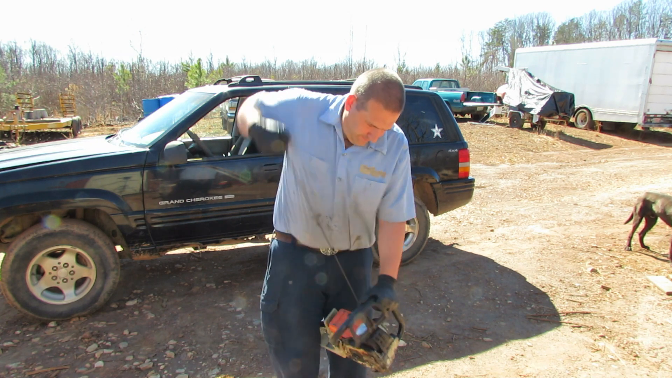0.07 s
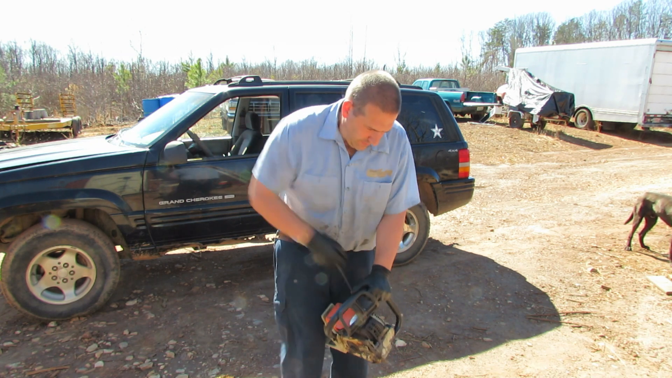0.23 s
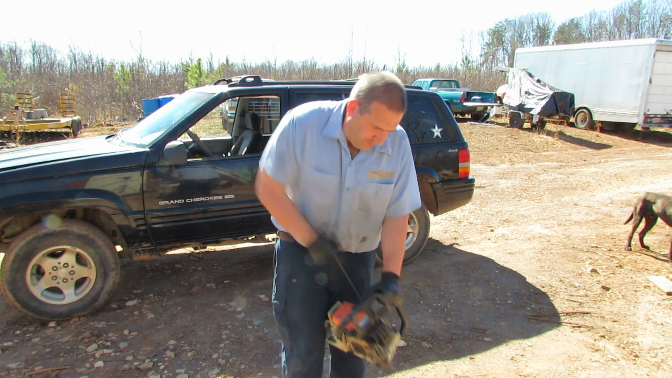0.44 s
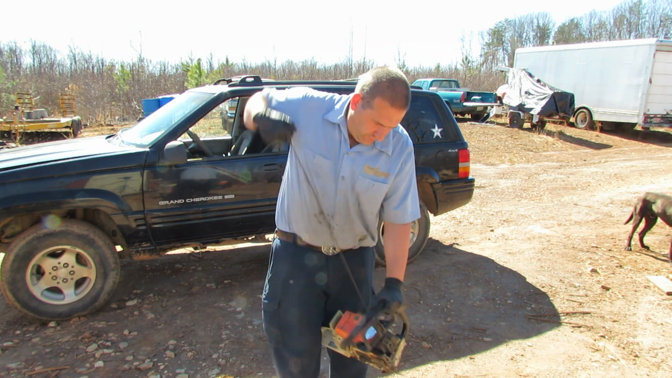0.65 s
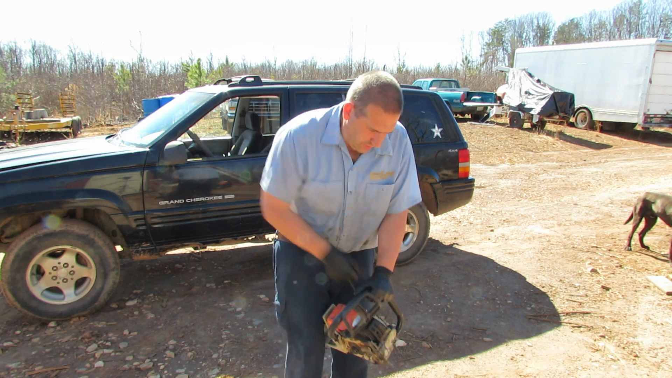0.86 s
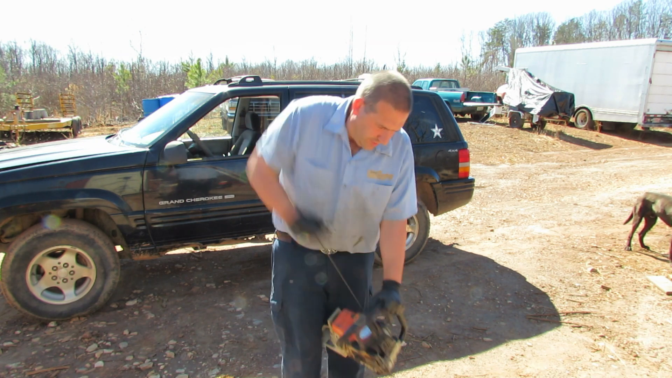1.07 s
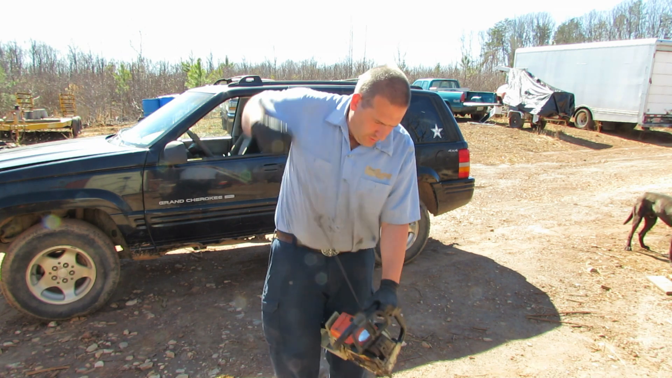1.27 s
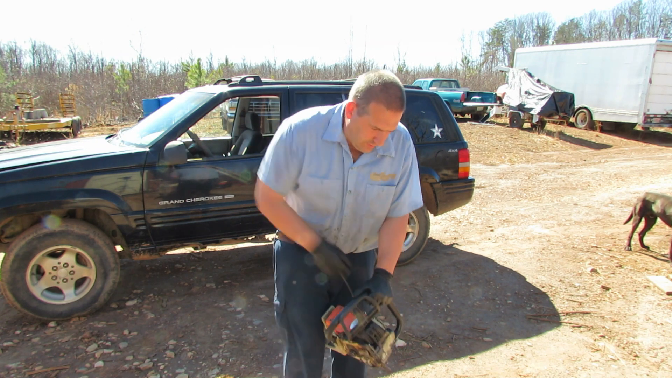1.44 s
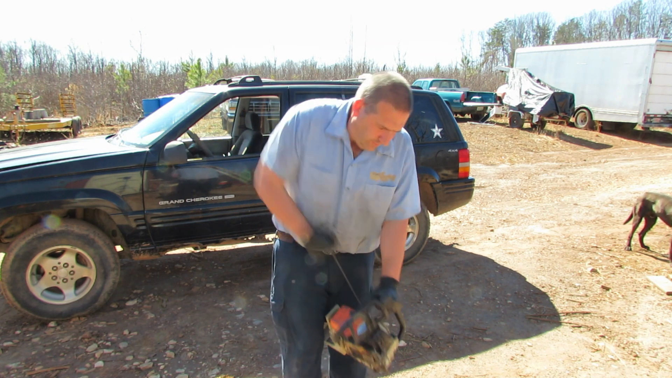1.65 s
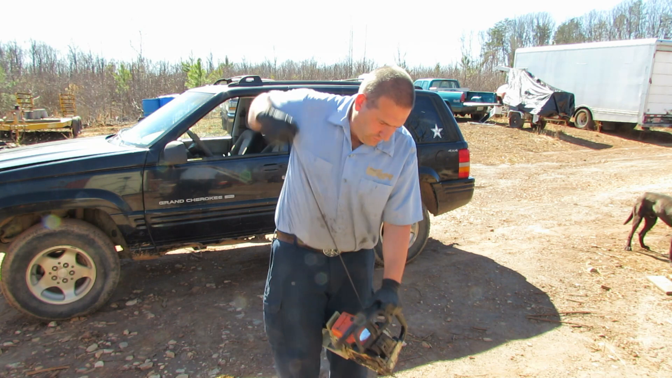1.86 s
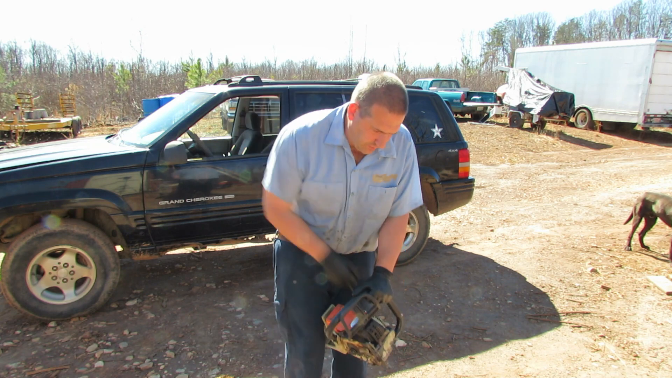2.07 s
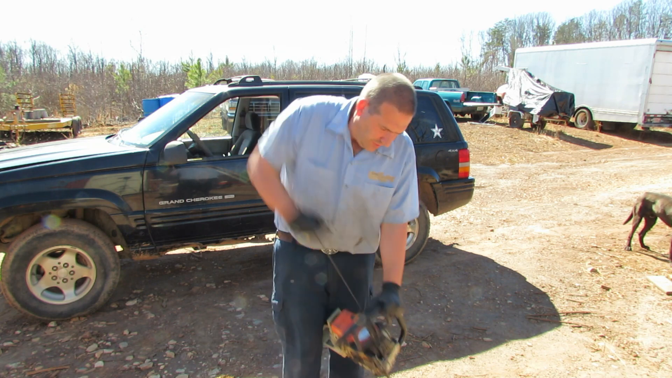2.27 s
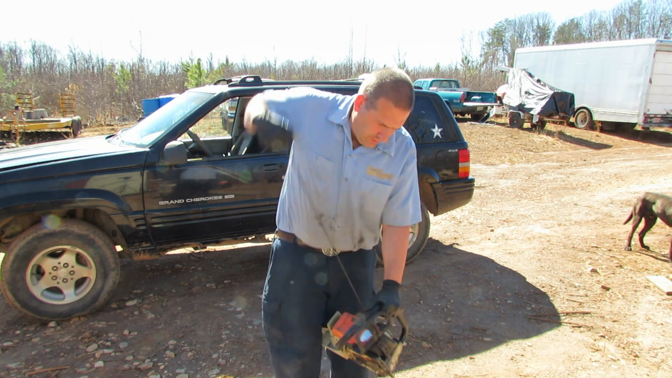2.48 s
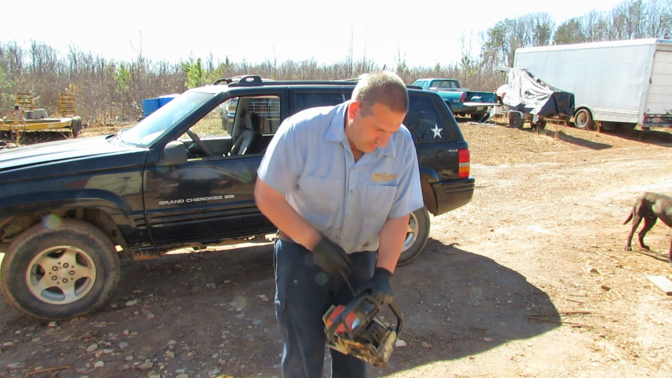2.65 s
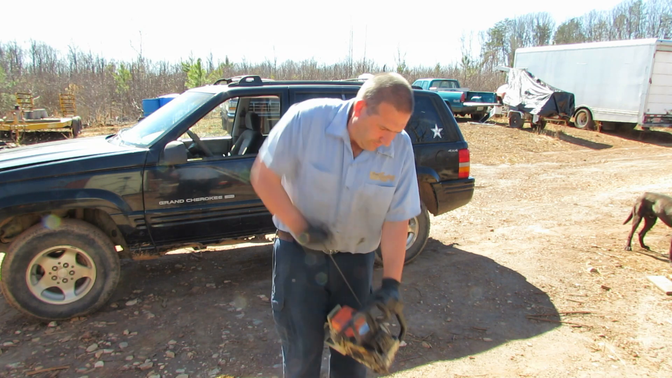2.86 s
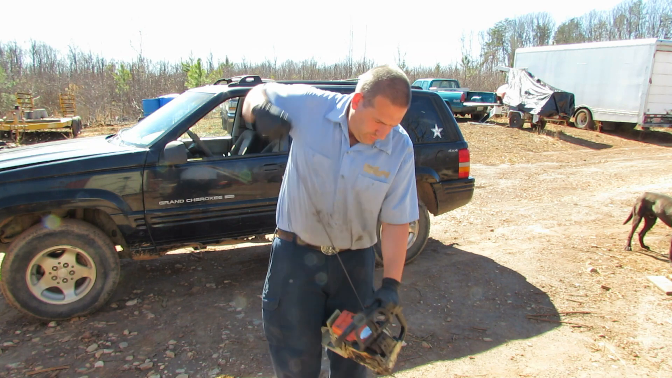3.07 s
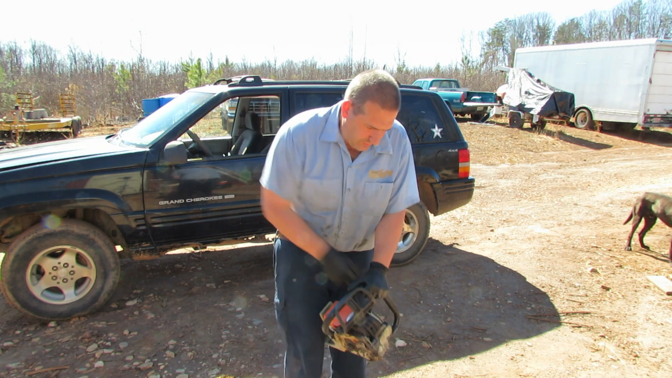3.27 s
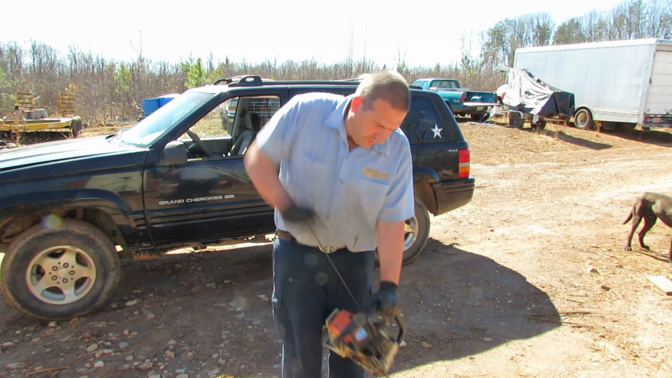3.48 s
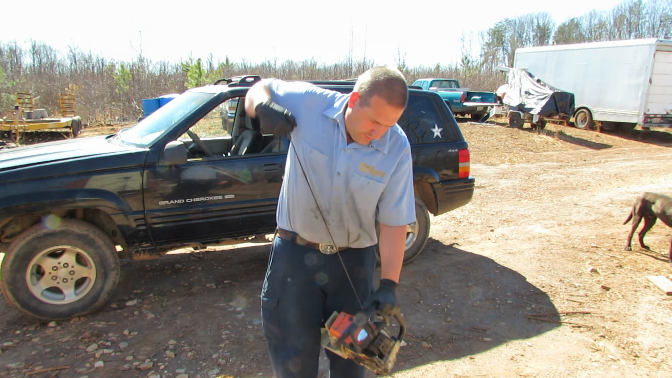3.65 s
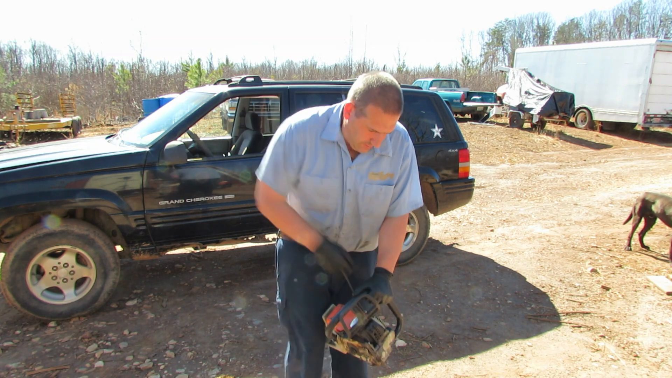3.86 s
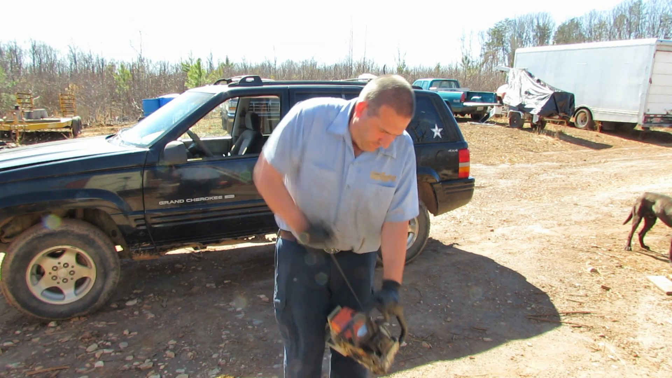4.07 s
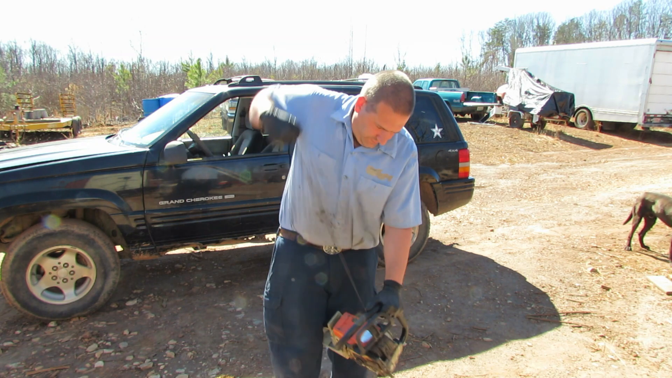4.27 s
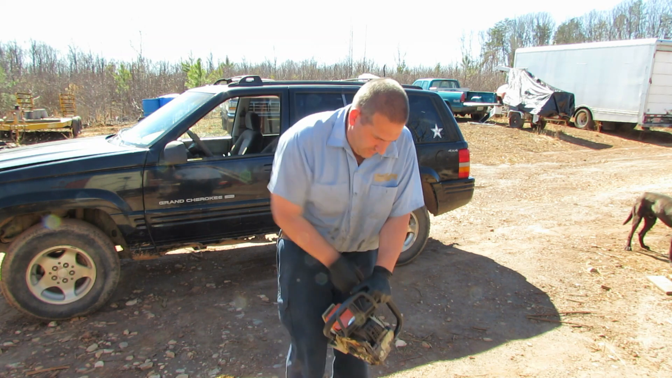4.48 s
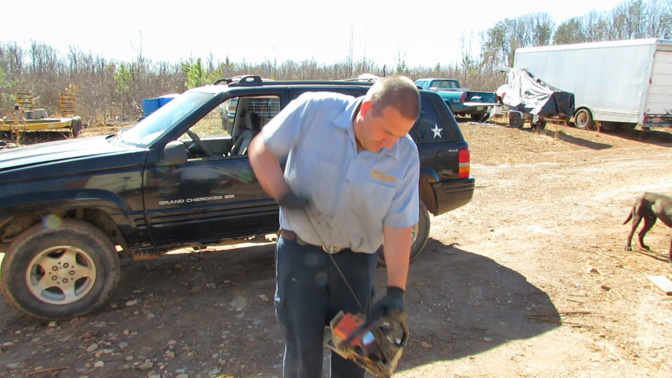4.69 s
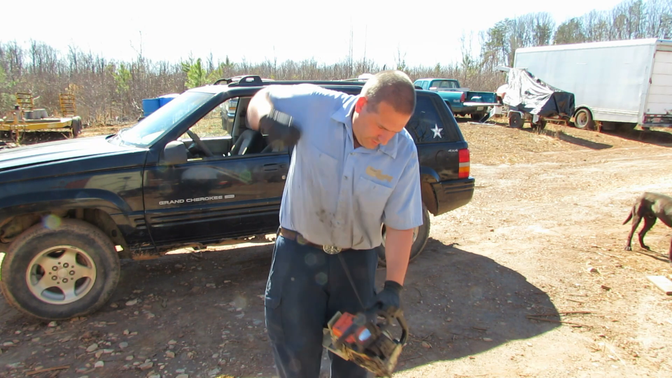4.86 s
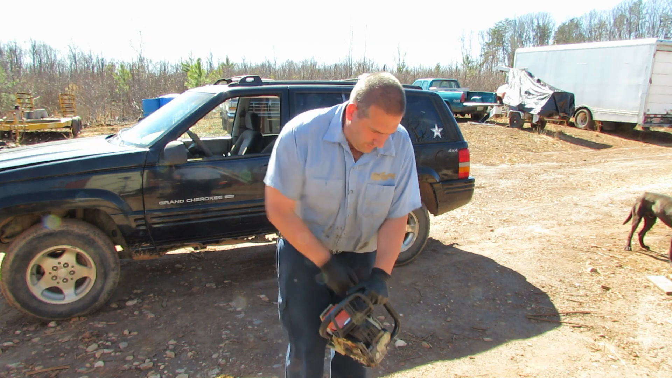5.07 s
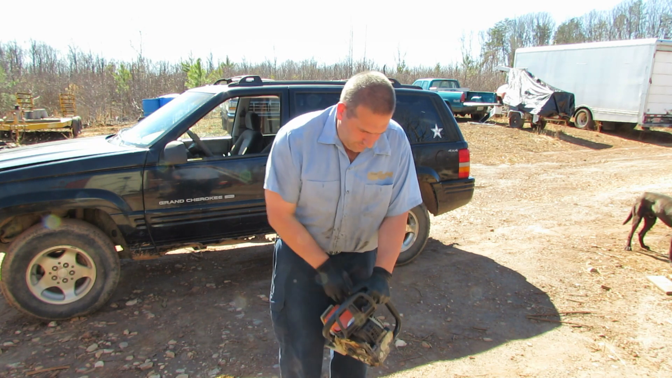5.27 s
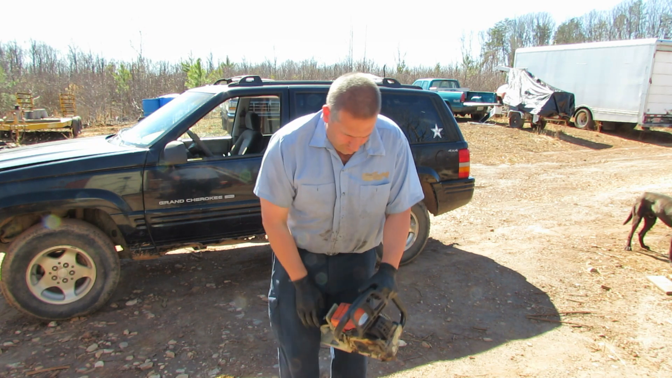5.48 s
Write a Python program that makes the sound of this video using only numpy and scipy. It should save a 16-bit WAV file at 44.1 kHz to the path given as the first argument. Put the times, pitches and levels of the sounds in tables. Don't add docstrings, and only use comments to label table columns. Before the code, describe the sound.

Close outdoor capture of a small two-stroke chainsaw being pull-started. Nine quick pulls, about 0.6 seconds apart, each give a burst of bright whistling chuffs and dull thumps, followed by cord rewind, grip knock and pawl clack. The level drops abruptly halfway. The last pull catches and the engine revs up roughly with cracking firings.

```python
import sys
import numpy as np
from scipy import signal
from scipy.fft import rfft, irfft, next_fast_len
from scipy.io import wavfile
from scipy.ndimage import uniform_filter1d

SR = 44100
rng = np.random.default_rng(int(sys.argv[2]) if len(sys.argv) > 2 else 0)


def put_to_file(sound):
    columns = np.atleast_2d(sound).T
    safe = np.clip(columns, -1, 1)
    whole_steps = np.round(safe * 32767)
    wavfile.write(sys.argv[1], SR, whole_steps.astype(np.int16))


def invert_db(level):
    return 10 ** (np.asarray(level, dtype=float) / 20)


N = 243873

GAIN_CUT_S, GAIN_CUT_DB = 3.019, -13

# first_turn_s, up_to_speed_s, cord_end_s, last_coasting_turn_s
PULLS = [
    (-.137, -.098, .0245, .158),
    (.4591, .4998, .6237, .7467),
    (1.0583, 1.0989, 1.2204, 1.337),
    (1.6606, 1.7013, 1.828, 1.9706),
    (2.2709, 2.3108, 2.4284, 2.5363),
    (2.8707, 2.9087, 3.0286, 3.139),
    (3.4748, 3.513, 3.6335, 3.7468),
    (4.0727, 4.113, 4.2322, 4.3391),
    (4.6702, 4.7082, 4.824, 4.93),
]
PULL_DB = [-3.5, -0.2, -0.4, -0.5, 0.66, 0.16, -0.6, -0.2, 0.5]
STAGES = [0, 1, 1.259, 1.498, 1.736, 2, 2.358, 3]
# time_s, speed_turns_per_s
SPEED = [(4.79, 53.7), (4.83, 60.7), (4.88, 73.7), (4.98, 93.3), (5.12, 104.3), (5.2, 110.6), (5.3, 110.4),
         (5.42, 113.2), (5.53, 113.2)]
# pitch_hz, density_db
RUMBLE = [(50, -77), (160, 8.5), (350, 14.5), (450, 11), (800, 8), (1250, 7), (2200, 3), (3200, -68.5)]


def gain_db(s):
    return GAIN_CUT_DB * np.clip((np.asarray(s) - GAIN_CUT_S) * 500, 0, 1)


def in_time(rows):
    s, *columns = np.transpose(rows)
    return [np.interp(np.arange(N) / SR, s, c) for c in columns]


def clicks(s, db):
    out = np.full(N, 1e-18)
    at = np.clip(np.round(np.asarray(s) * SR).astype(int), 0, N - 1)
    np.add.at(out, at, invert_db(db - gain_db(s)))
    return out


def burst(x, rise_ms, fall_ms):
    rise = np.exp(-1000 / SR / max(rise_ms, .05))
    fall = np.exp(-1000 / SR / max(fall_ms, .05))
    return signal.lfilter([1 - rise], [1, -rise], signal.lfilter([1], [1, -fall], x))


def noise(spectrum):
    # pitch_hz, side_minus_mid_db
    width_curve = [(35, 11.5), (75, -16), (130, -18.5), (400, -33), (1300, -11.5), (4400, -11.5),
                   (8100, -3), (14000, -1.5)]
    # pitch_hz, left_minus_right_db
    lean_curve = [(100, 0.5), (1500, -3), (4400, -1.8), (8100, 2), (13000, -4.5)]
    size = next_fast_len(N, real=True)
    log_hz = np.log(np.maximum(np.arange(size // 2 + 1) * SR / size, 5))

    def curve(points):
        hz, db = np.transpose(points)
        return np.interp(log_hz, np.log(hz), db)

    mid, side = rfft(rng.standard_normal((2, size))) * invert_db(curve(spectrum))
    side = side * invert_db(curve(width_curve) - 0.5)
    lean_db = curve(lean_curve) / 2
    out = irfft([(mid + side) * invert_db(lean_db), (mid - side) * invert_db(-lean_db)], size)[:, :N]
    return out / np.sqrt(np.mean(out ** 2))


def band(low_hz, high_hz):
    return noise([(low_hz / 5, -60), (low_hz / 2, -22), (low_hz, 0),
                  (high_hz, 0), (high_hz * 1.7, -22), (high_hz * 4, -70)])


def above(x, hz):
    return signal.sosfilt(signal.butter(4, hz, "high", fs=SR, output="sos"), x)


def ring(x, hz, t60):
    r, w = invert_db(-60 / (t60 * SR)), 2 * np.pi * hz / SR
    return signal.lfilter([0, np.sin(w)], [1, -2 * r * np.cos(w), r * r], x)


def resonate(x, hz, width_hz):
    return ring(x, hz, 2.2 / width_hz) * np.sqrt(width_hz / SR)


def strike(s, db, modes, spread_db):
    chance = spread_db * rng.standard_normal((len(s), len(modes)))
    return sum(ring(clicks(s, db + level_db + chance[:, k]), hz, t60)
               for k, (hz, level_db, t60) in enumerate(modes))


def turns():
    # chuff_db, whistle_db, thump_db
    stroke = [
        (-24.5, -16.5, -13),
        (-5.5, -9.5, -18),
        (-10.5, -9.5, -17.5),
        (-11, -10.5, -17),
        (-11.5, -11.5, -17),
        (-11.5, -14, -17.5),
        (-19.5, -18, -26),
        (-21.5, -16.5, -44),
    ]
    # start_s, whistle_db
    rocks = [
        (3.218, -40),
        (3.8247, -41),
        (4.416, -39.5),
    ]
    s = np.concatenate([np.interp(STAGES, np.arange(len(times)), times) for times in PULLS])
    db = np.concatenate([np.array(stroke) + pull_db for pull_db in PULL_DB]) + gain_db(s)[:, None]
    db = db + 1.2 * rng.standard_normal(db.shape)
    rock_rows = [(at, level - 11, level, level - 6) for at, level in rocks]
    rows = np.vstack([np.column_stack([s, db]), rock_rows])
    rows = rows[(rows[:, 0] > -.012) & (rows[:, 0] < SPEED[0][0] - .01)]
    return rows[np.argsort(rows[:, 0])]


def whistle(envelope):
    # pitch_hz, width_hz, level_db
    slots = [(3540, 480, -8), (4396, 296, 0.5), (4830, 280, -34), (4970, 160, -18), (5290, 1460, -7),
             (8500, 290, -16.5)]
    air = envelope * band(2900, 12000)
    return sum(invert_db(db) * (-1) ** k * resonate(air, hz, width) for k, (hz, width, db) in enumerate(slots))


def cranking():
    # pitch_hz, density_db
    chuff_color = [(410, -41), (700, 0), (2240, -8), (4100, 2), (7290, 0), (9480, 1), (10800, -3),
                   (14400, -10.5), (16000, -41.5)]
    # pitch_hz, level_db, t60_s
    can = [(111.3, -17, 0.23), (133.4, -16, 0.14), (170, -17.5, 0.094), (272.7, -3.5, 0.048),
           (379, 7, 0.0043), (457.2, -9, 0.12), (800, 5.5, 0.013), (1234, -2.5, 0.032),
           (1820, 10.5, 0.0048)]
    catch_s = 4.73
    s, chuff_db, whistle_db, thump_db = turns().T
    opening = clicks(s, chuff_db)
    puff_shape = invert_db(0.5) * burst(opening, 1.0, 2.47) + invert_db(-23.0) * burst(opening, 0.91, 14.0)
    chuff = puff_shape * noise(chuff_color)
    peak = burst(clicks(s + .004, whistle_db), 1.8, 1.3)
    squeeze = invert_db(13.0) * peak + invert_db(-9) * burst(clicks(s, whistle_db), 0.23, 21.3)
    thump_s = s + np.clip(np.gradient(s) / 3, .007, .0145)
    high = strike(thump_s, thump_db - 12 * (s > catch_s + .02), can[4:], spread_db=1.0)
    low = strike(thump_s - .003, thump_db - 17 * (s > catch_s), can[:4], spread_db=2.0)
    thump = -invert_db(-3.0) * above(high + low, 94.0)
    thump = burst(thump, 0.17, 0.055) * invert_db(-10.0)
    puff = invert_db(-10) * burst(clicks(thump_s, thump_db), 1.5, 6) * band(500, 3500)
    shaking = burst(clicks(thump_s, thump_db), 10, 90)
    wander = np.sqrt(600) * uniform_filter1d(rng.standard_normal(N), size=600)
    lumps = invert_db(-34 + 3 * wander)
    shudder = shaking * (invert_db(-34.0) * band(94, 161) + lumps * band(350, 324))
    return chuff + whistle(squeeze) + thump + puff + shudder


def order(x, turn, count):
    spin = np.exp(2j * np.pi * count * turn)
    still = x / spin
    slow = uniform_filter1d(still.real, size=900) + 1j * uniform_filter1d(still.imag, size=900)
    return 2 * (slow * spin).real


def running():
    # time_s, first_order_db, thump_db, hiss_db, gust_over_hiss_db
    loudness = [(4.79, -56, -48, -33, 3), (4.83, -57, -46, -36.5, 14), (4.87, -57, -48, -37.5, 10.5),
                (4.93, -53, -42, -33.5, 5), (4.98, -51, -40, -39, 14), (5.04, -51, -43, -32, -2),
                (5.1, -51, -44.5, -34, -6), (5.2, -49, -50, -35, -12), (5.3, -52, -46, -34.5, -27),
                (5.42, -48.5, -49.5, -37, 2), (5.53, -50, -49, -36.5, -8)]
    # start_s, peak_db, top_end_rel_db
    firings = [(5.01, -19, -3), (5.0507, -15.5, -7), (5.081, -14, -7.5), (5.1093, -13.5, -9),
               (5.145, -30, -12), (5.1484, -21, -6), (5.167, -18, -12), (5.187, -23, -15),
               (5.203, -15, -3.5), (5.231, -18.5, -3.5), (5.2668, -15.5, -6), (5.2945, -14, -29),
               (5.33, -15, -8.5), (5.3555, -12, -10), (5.392, -13.5, -7.5), (5.437, -16.5, -3.5),
               (5.472, -15.5, -7), (5.5067, -12, -9.5)]
    # start_s, level_db
    coughs = [
        (4.772, -38),
        (4.791, -32.5),
        (4.809, -33),
    ]
    # pitch_hz, level_db, t60_s
    hot_can = [(270, -12, 0.02), (437, -5, 0.04), (665, -2, 0.035), (785, -1, 0.044), (1020, -8, 0.03),
               (1130, -12, 0.03), (1440, -9, 0.03), (1800, -7, 0.025)]
    # pitch_hz, level_db, t60_s
    boom_modes = [(296, -13, 0.03), (394, 0, 0.052), (470, -3.5, 0.054), (620, 2.5, 0.041)]
    # order, added_share_db
    vane_orders = [(2, -5), (3, -3), (5, -4), (7, -8), (9, -5), (10, -4), (13, -4)]
    # pitch_hz, density_db
    exhaust = [(880, 3.5), (1500, -10), (1840, -5.5), (2300, -8.5), (2970, 0.5), (4090, 2), (4500, -1.5),
               (4860, 5), (12100, -9), (14500, -13), (15500, -42.5)]
    # pitch_hz, width_hz, level_db
    shell = [(2510, 150, -9), (3140, 90, -7.5), (3710, 47, -10.5), (4590, 76, -5), (5120, 27, -18),
             (5800, 37, -16.5)]
    t = np.arange(N) / SR
    first_db, thump_db, hiss_db, gust_db = in_time(loudness)
    on = np.clip((t - SPEED[0][0]) / 0.027 + 1, 0, 1)
    turn = np.cumsum(in_time(SPEED)[0] * (t >= SPEED[0][0])) / SR - .09
    at = np.flatnonzero(np.diff(np.floor(turn)) > 0)
    s = t[at] - .0012 + .0001 * rng.standard_normal(len(at))
    level_db = thump_db[at] + 7.0
    thump = strike(s, level_db, hot_can[:2] + hot_can[3:], spread_db=0)
    thump = thump - strike(s, level_db, hot_can[2:3], spread_db=0)
    thump = -above(thump, 150)
    thump = thump + sum(invert_db(db) * order(thump, turn, count=k) for k, db in vane_orders)
    first = invert_db(first_db + 3 - GAIN_CUT_DB) * on * np.sin(2 * np.pi * turn)
    second_db = -53.0 - 60.0 * (t - SPEED[1][0]) * on
    first = first - invert_db(second_db - GAIN_CUT_DB) * on * np.sin(4 * np.pi * turn)
    body = invert_db(thump_db - 21 - GAIN_CUT_DB) * on * noise(RUMBLE)
    body = body + invert_db(-58.0) * on * band(40, 70)
    gust_level_db = (hiss_db + gust_db)[at] + 1.5 * rng.standard_normal(len(at))
    gusts = burst(clicks(s - .001, gust_level_db), .5, 3.2)
    hiss = (gusts + invert_db(hiss_db - GAIN_CUT_DB) * on) * above(noise(exhaust), 950)
    hiss = invert_db(-2.0) * hiss + sum(invert_db(db + 1.0) * resonate(hiss, hz, width) for hz, width, db in shell)
    fire_s, fire_db, top_db = np.transpose(firings)
    crack = burst(clicks(fire_s + 0.0011, fire_db - 14.5), 0.18, 7.3) * band(1350, 4800)
    crack = crack + burst(clicks(fire_s + 0.0017, fire_db + top_db - 5.0), 0.4, 3.4) * band(6000, 10700)
    boom = strike(fire_s + 0.00095, -39.0 + 0.33 * (fire_db + 16), boom_modes, spread_db=2.5)
    boom = boom + ring(clicks(*np.transpose(coughs)), 430, 0.072)
    return thump + first + body + hiss + whistle(invert_db(2.0) * gusts) + crack + above(boom, 140)


def fins():
    # pitch_hz, level_db, t60_s
    fin_modes = [(4430, -26.5, 0.07), (5670, -29, 0.084), (8100, -22.5, 0.054), (9860, -37, 0.1),
                 (11080, -55, 0.089), (12600, -39, 0.19), (13900, -48, 0.094)]
    # start_s, peak_db
    grit = [(0.8474, -36), (0.8604, -44), (0.9214, -50), (2.6539, -51), (2.67, -35), (2.7003, -36),
            (2.7074, -31), (2.7254, -44)]
    s, chuff_db = turns().T[:2]
    tick_s, tick_db = np.transpose(grit)
    ticks = burst(clicks(tick_s, tick_db - 9.0), 0.18, 1.2) * band(6500, 12500)
    fin_db = 1.35 * (chuff_db - gain_db(s)) + gain_db(s) + 3.5
    return strike(s + 0.0032, fin_db, fin_modes, spread_db=5) + ticks


def coasting():
    # pitch_hz, level_db, t60_s
    clip_modes = [(6540, -29, 0.072), (11000, -44, 0.015), (12300, -30, 0.033), (15500, -39.5, .03)]
    # pitch_hz, level_db, t60_s
    frame_modes = [(125.4, 0, 0.033), (273, -7.5, .04), (452.5, 1.5, 0.063), (1128, -4, 0.08)]
    _, _, cord_end, last = np.transpose(PULLS[:-1])
    db = np.array(PULL_DB)
    start = np.array(PULLS)[1:, 0]
    start_db = db[1:] + gain_db(start)
    jingle = strike(start + .0205, start_db, clip_modes, spread_db=8.5)
    jingle = jingle + burst(clicks(start + 0.01, start_db - 27.0), 3.6, 2.1) * band(3600, 9000)
    slow_s = cord_end + (last - cord_end) * (STAGES[6] - 2) + .0135
    s = np.concatenate([slow_s, last + .007, start - .02])
    level_db = np.concatenate([db[:-1] - 31.5, db[:-1] - 32, db[1:] - 46]) + gain_db(s)
    knock = burst(strike(s, level_db, frame_modes, spread_db=2.5), 0.19, 0.046) * invert_db(-5.5)
    snap = clicks(last + .0004, db[:-1] - 18.5 + gain_db(last)) + clicks(start, start_db - 16.5)
    snap = burst(snap, 0.08, 1.9) * band(1350, 8300)
    return snap + jingle + knock


def pawls():
    # start_s, peak_db, crack_rel_db, tick_before_rel_db
    bites = [(0.415, -14.5, -8.5, -32), (1.02, -14, -7, -20), (1.619, -14, -8, -38), (2.221, -18, -8, -32),
             (2.824, -14, -6, -24), (3.433, -28.5, -3.5, -16), (4.025, -32.5, -7.5, -35),
             (4.621, -30, -5.5, -32)]
    # start_s, peak_db, spring_ring_rel_db
    releases = [(0.091, -25, -31), (0.683, -24, -23.5), (1.278, -25.5, -21), (1.8976, -24, -29),
                (2.481, -24, -22.5), (3.0853, -42.5, -23), (3.6895, -40.5, -21), (4.283, -44, -12.5)]
    # pitch_hz, level_db, t60_s
    pulley = [(431, -9, .045), (620, -7, .035), (780, -5, .035), (1130, -4, .028), (1240, 0, .034),
              (1500, -9, .025)]
    s, db, crack_db, tick_db = np.transpose(bites)
    bite = sum(strike(s + lag, db + drop_db, pulley, spread_db=3.0)
               for lag, drop_db in [(.0002, -9), (.002, -8), (.0045, -6.5), (.013, -13.5)])
    bite = above(bite, 472) + burst(clicks(s - .0005, db + crack_db), 0.24, 7.1) * band(1500, 8900)
    bite = bite + invert_db(-6.5) * burst(clicks(s - .0005, db), 0.62, 6.8) * band(470, 1690)
    tick = burst(clicks(s - .011, db + tick_db), 0.85, 2.5) * band(1870, 4100)
    s, db, ring_db = np.transpose(releases)
    grind = band(3200, 4300) + invert_db(-9) * band(450, 2500)
    rasp = burst(clicks(s, db + 5.5), 0.6, 4.3) * (grind + invert_db(-16.5) * band(6900, 12500))
    blow = clicks(s, db + ring_db)
    spring = invert_db(10.5) * ring(blow, 3079, 0.45) + invert_db(-12.0) * ring(blow, 3101, .2)
    return bite + tick + rasp + spring + ring(clicks(s + .004, db - 9.0), 4100, 0.13)


def grip():
    # start_s, peak_db, scrape_rel_db
    knocks = [(0.371, -29, -5.5), (0.961, -24.5, -6), (1.569, -30, -15), (2.166, -23.5, -5.5),
              (2.769, -27.5, -1.5), (3.374, -52, -11), (3.989, -46.5, -19), (4.572, -41, -3)]
    # pitch_hz, level_db, t60_s
    housing = [(575, 12.5, 0.012), (684, -1, 0.028), (763, -7, 0.086), (1150, -12, 0.057),
               (1380, -24.5, 0.053)]
    s, db, scrape_db = np.transpose(knocks)
    knock = sum(strike(s + lag, db + drop_db, housing, spread_db=4.0)
                for lag, drop_db in [(0, -8), (.005, -3.5), (.015, -13.5), (.027, -36.5)])
    scrape = burst(clicks(s, db + scrape_db + 2.0), 2.8, 3.7) * band(1100, 3080)
    fizz = burst(clicks(s, db - 29.5), 1.8, 16) * band(5000, 10840)
    return above(knock, 610) + scrape + fizz


def rewind():
    # start_s,
    # peak_db, low_rel_db, top_rel_db, swell_ms
    swells = [(0.0034, -32.5, 14.5, 6, 6.8), (0.218, -38.5, 2, 0, 4.3), (0.254, -33, 1.5, -20, 9.5),
              (0.278, -29.5, 1.5, 0, 6.5), (0.846, -30, -1.5, -21, 16), (0.879, -26, -0.5, 0, 6.8),
              (1.424, -22.5, -6.5, -13, 4.1), (1.485, -29.5, -1, -6, 9.9), (2.0614, -51, 18.5, 12, 3.3),
              (2.085, -37, 5, -15, 11), (2.109, -28.5, -2, -4.5, 5.3), (2.617, -20, -5.5, -15, 3.5),
              (2.6905, -31.5, 2, -8, 15.4), (3.2859, -47, -2, -7, 6.5), (3.3453, -40, -2.5, -10.5, 8.2),
              (3.908, -40, -6, -1.5, 6.8), (3.956, -41.5, -32.5, -30, 5), (4.475, -39.5, -8, -43, 5.2),
              (4.526, -40, -8, -3, 3.9), (4.6444, -44, 8, -18, 5.7)]
    # start_s, pitch_hz, level_db, t60_s
    struck_tones = [(0.22, 6300, -37, 0.041), (.312, 3720, -54, 1), (.315, 5900, -70, 1),
                    (0.779, 6000, -51, 0.39), (.9, 3760, -65, 0.65), (2.56, 6470, -23, 0.042),
                    (2.56, 7000, -39, 0.089), (2.56, 12600, -41, .06), (.29, 810, -35, 0.092),
                    (.88, 2800, -36, 0.073), (.92, 3680, -56, .3), (1.5, 795, -35.5, 0.092),
                    (2.09, 780, -37, 0.16), (3.228, 3110, -59, 0.39), (3.738, 6400, -52, 0.19),
                    (3.833, 3130, -45, 0.089), (4.263, 3080, -47, 0.48), (4.527, 4600, -38, 0.035),
                    (4.53, 3200, -69.5, .8), (.79, 1700, -48, .4), (.81, 3500, -58, .5),
                    (.16, 12000, -52, 0.3), (2.765, 640, -29.5, 0.06), (.996, 740, -40, 0.044),
                    (1.423, 1150, -34.5, .06), (2.62, 470, -38, 0.049), (4.05, 3900, -57, .05),
                    (3, 770, -49, .3), (3.378, 760, -53, .05), (3.375, 3750, -70, .4),
                    (3.27, 5000, -71, 0.37), (3.36, 7000, -71, .4)]
    t, low, mid, top = np.arange(N) / SR, np.zeros(N), np.zeros(N), np.zeros(N)
    for s, db, low_db, top_db, swell_ms in swells:
        swell = np.exp(-np.abs(t - s - .003) * 1000 / max(swell_ms, 1))
        shape = invert_db(db - 9.0 - gain_db(s)) * swell
        low = low + invert_db(low_db) * shape
        mid = mid + shape
        top = top + invert_db(top_db) * shape
    pings = sum(ring(clicks([s], db), hz, t60) for s, hz, db, t60 in struck_tones)
    return low * band(410, 1330) + mid * band(2080, 4060) + top * band(7900, 8400) + pings


def yard(x):
    dull, out = above(signal.lfilter([.35], [1, -.65], x), 240), x.copy()
    for lags_ms, db in [((5.5, 5.9), -15), ((13, 11), -16), ((24, 29), -20), ((47, 41), -25)]:
        for side, ms in enumerate(lags_ms):
            lag = int(ms * SR / 1000)
            out[side, lag:] += invert_db(db) * dull[side, :-lag]
    return out


def background():
    # after_first_turn_s, level_db
    shake = [(-.004, -9), (.004, 5), (.025, 1), (.155, -0.5), (.255, -11), (.355, -17.5), (.445, -17),
             (.515, -23.5)]
    # pitch_hz, density_db
    rustle = [(1200, -18), (1900, -0.5), (3100, 9), (4400, 6.5), (7000, 0), (8300, -1.5), (11500, -9.5),
              (14500, -57.5)]
    # pitch_hz, width_hz, level_db
    case = [(122, 28, -5.5), (175, 25, -2), (277, 27, 4.5), (349, 32, -2), (447, 100, 1.5)]
    still_level_db, settle_s = -11.5, 0.27
    t = np.arange(N) / SR
    shake_db, = in_time([(pull[0] + lag, db + pull_db)
                         for pull, pull_db in zip(PULLS, PULL_DB) for lag, db in shake])
    caught_db = -30 * (t > SPEED[0][0])
    low_db = -33 + 0.75 * shake_db + caught_db
    high_db = -36 + 1.04 * shake_db + caught_db
    flutter = uniform_filter1d(rng.standard_normal((3, N)), size=300) * np.sqrt(300)
    flutter = np.clip(flutter, -3, 1.3)
    wind = invert_db(-52.5 + 6.9 * flutter[2]) * band(22, 30)
    air = invert_db(-44.5 + 1.18 * shake_db + caught_db + 3 * flutter[2]) * band(11000, 13500)
    still_db, = in_time([row for first, _, _, last in PULLS for row in
                         [(first - .04, still_level_db), (first, 0), (last, 0),
                          (last + settle_s, still_level_db)]])
    rumble = noise(RUMBLE)
    upper = signal.lfilter(*signal.iirnotch(1040, 4.0, SR), above(rumble, 596))
    deep = signal.sosfilt(signal.butter(4, 560, fs=SR, output="sos"), rumble)
    hum = sum(invert_db(db + 2.0) * (-1) ** k * resonate(deep, hz, width) / 8
              for k, (hz, width, db) in enumerate(case))
    deep = invert_db(-9.0) * deep + hum
    bearings = invert_db(low_db + 4.26 * flutter[0]) * (upper + invert_db(still_db) * deep)
    rattle = invert_db(high_db + 6.0 * flutter[1]) * noise(rustle)
    return air + bearings + rattle + wind


def scene():
    saw = cranking() + fins() + coasting() + running() + grip() + pawls() + rewind()
    return yard(saw) + background()


def low_pass(x):
    return signal.sosfilt(signal.butter(12, 16470, fs=SR, output="sos"), x)


def record(dry):
    x = dry * invert_db(gain_db(np.arange(N) / SR))
    x = signal.sosfilt(signal.butter(2, 45, "high", fs=SR, output="sos"), above(x, 30))
    x = 1.1 * np.tanh(x / 1.1)
    x = signal.sosfilt(signal.cheby2(8, 40, 16450, fs=SR, output="sos"), x)
    return low_pass(x)


dry = scene()
out = record(dry)
put_to_file(out)
```